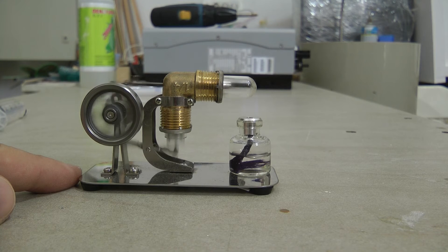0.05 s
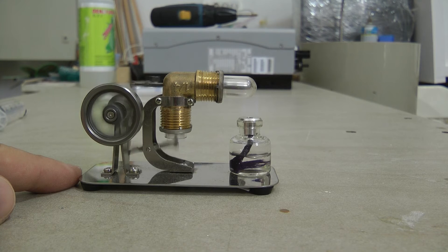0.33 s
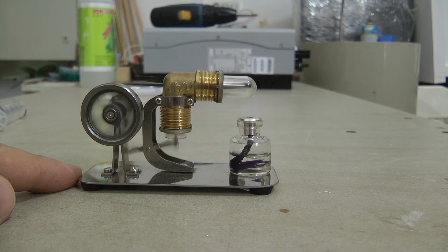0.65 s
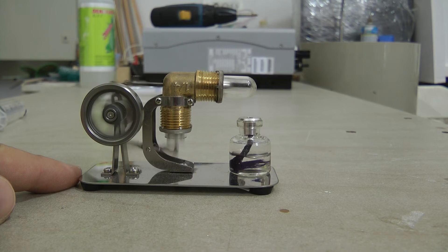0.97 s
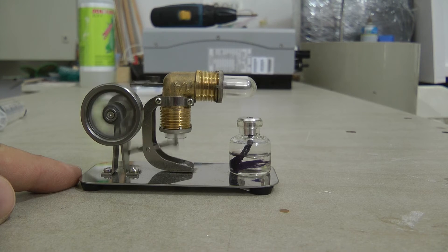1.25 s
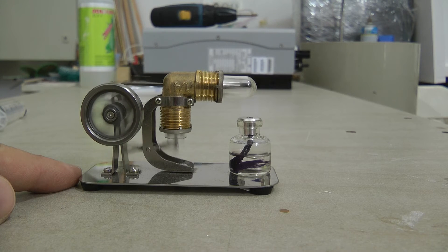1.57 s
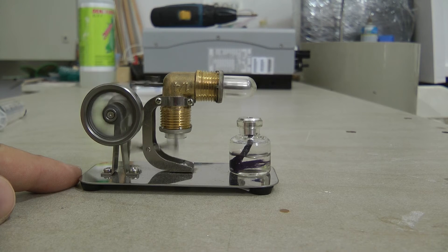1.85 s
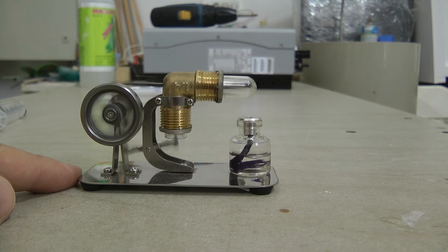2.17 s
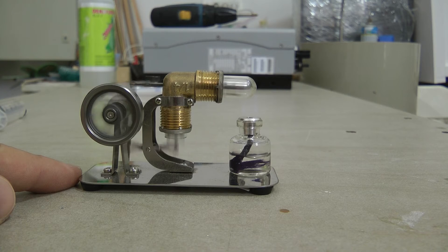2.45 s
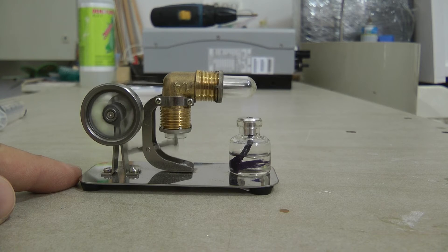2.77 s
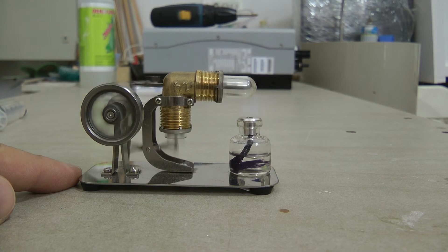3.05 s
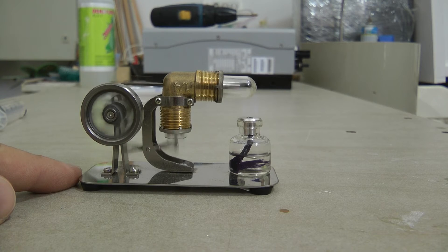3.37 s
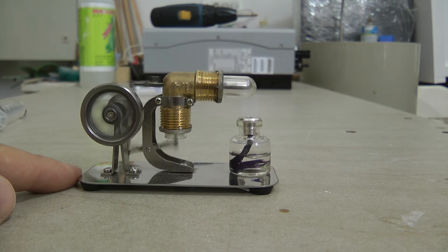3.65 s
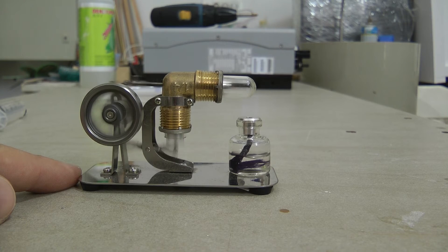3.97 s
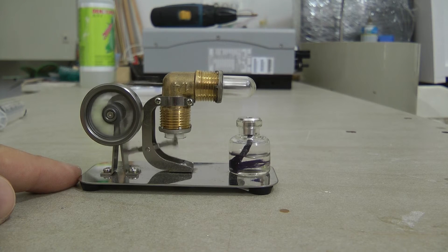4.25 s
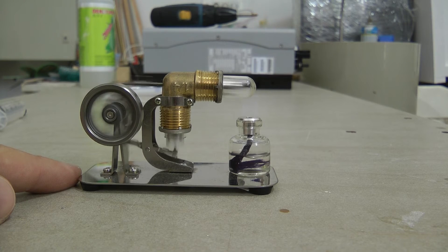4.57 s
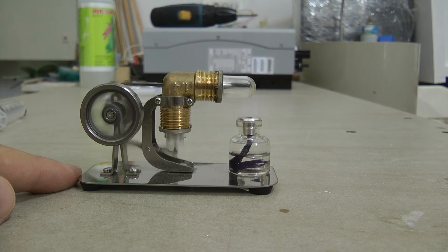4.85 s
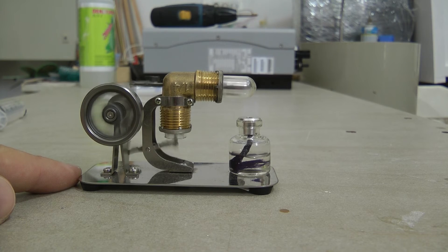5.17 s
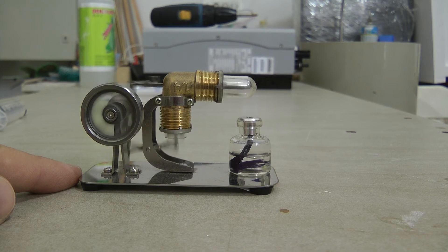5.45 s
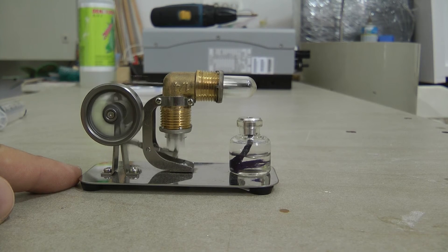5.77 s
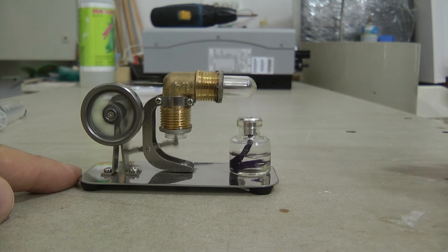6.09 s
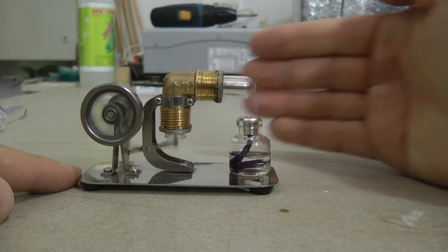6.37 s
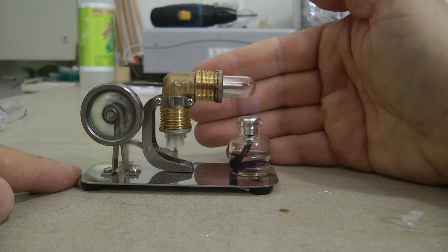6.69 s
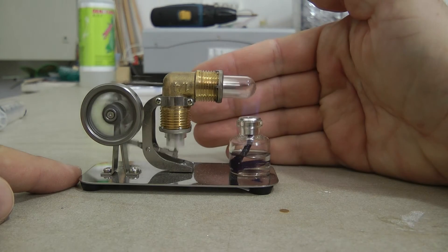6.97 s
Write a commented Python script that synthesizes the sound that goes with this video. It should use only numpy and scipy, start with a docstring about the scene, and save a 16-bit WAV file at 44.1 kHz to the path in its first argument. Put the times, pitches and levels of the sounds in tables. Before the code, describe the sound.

A small model hot-air engine runs without pause on a workbench in a quiet room. Its loose rods tick rapidly and its pistons scrape, making a bright, ringing metallic clatter over a hollow rattle from the base and a low bench hum. It gradually gets a little faster and louder. Near the end the tone shifts slightly and the base bumps softly twice. The sound is close, with little reverberation.

```python
"""A model hot-air engine runs on a workbench in quiet room noise, starting near 16 turns a second.
In each turn its loose rods knock five times and its two pistons scrape to and fro; the metal frame
rings, the base plate thuds and the bench hums. Fixed resonances colour the clatter from the start.
The speed creeps up to nearly 18 turns a second. From 6 s a nearing hand varies that colour and
strengthens a short echo, and near 6.7 s the base bumps softly twice."""
import sys
import numpy as np
from scipy import signal
from scipy.fft import rfft, irfft, next_fast_len
from scipy.io import wavfile
from scipy.ndimage import uniform_filter1d, map_coordinates

SR = 44100
rng = np.random.default_rng(int(sys.argv[2]) if len(sys.argv) > 2 else 0)


def generate_wav(sig):
    """Save sig (samples, or channels by samples) to the path in sys.argv[1] as 16-bit PCM at SR."""
    pcm = np.round(np.clip(np.atleast_2d(sig).T, -1, 1) * 32767).astype(np.int16)
    wavfile.write(sys.argv[1], SR, pcm)


N = 314433
TIME_S = np.arange(N) / SR
FFT_SIZE = next_fast_len(N + SR // 2, real=True)
BIN_HZ = np.fft.rfftfreq(FFT_SIZE, 1 / SR)
CRUISE_RPS = 17

# Spectral shapes. Each row: frequency in Hz, relative level in dB.
AIR_SPECTRUM = [(25, -28), (60, -9), (110, -9.5), (300, -0.5), (1000, -1.5), (4000, -14), (15000, -48)]
WORKSHOP_RUMBLE_SPECTRUM = [(25, -34), (50, -18), (85, -6), (200, -9), (300, -6), (450, -8), (1000, -22)]
BENCH_SPECTRUM = [(30.0, -30), (60.0, -13), (90.0, -2.5), (130.0, -6), (250.0, -2.5), (500.0, -6),
                  (800.0, -1.5), (1000.0, -18), (1500.0, -1.5)]
UNBALANCE_SPECTRUM = [(80, -4.5), (130, -7.5), (170, -2), (272, 0), (442, -6), (462, 0.5), (580, -4),
                      (700, 0)]
PLATE_SPECTRUM = [(200, -25.5), (450, -1.5), (600, -5), (740, -2.5), (820, 1.5), (940, -15), (1150, -9),
                  (1500, -13), (2500, -18), (4000, -30.5)]
FRAME_SPECTRUM = [(700.0, -7.5), (1000.0, -14), (1500.0, -19), (2400.0, -20), (2850.0, -15), (3300.0, -0.5),
                  (4300.0, -2), (4550.0, -10), (5050.0, -9), (5400.0, -3), (7200.0, -3), (7700.0, -8),
                  (12500.0, -8), (15600.0, -18)]
# Resonances. Each row: centre in Hz, width in Hz, gain in dB (negative for a notch).
BENCH_MODES = [(98, 13, 1.5), (178.4, 26, 6.5), (236, 11, 4.5), (288.3, 47, 9), (360, 29, 2.5),
               (458, 27.5, 12), (568, 27, 8)]
COLOUR_MODES = [(935, 280, 5.5), (1500, 930, -2), (3110, 306, -4), (3680, 210, -3.5), (4235, 730, 5.5),
                (5180, 370, 1), (6730, 950, -4), (9370, 400, -5), (9470, 325, 7.5), (11440, 700, 1)]
FRAME_MODES = [(1458, 350, 8.5), (2033, 370, 7.5), (2650, 140, 4.5), (3147, 126, 6.5), (3504, 31, 7.5),
               (3648, 193, 7.5), (3697, 17, 2), (3695, 34, 5), (4365, 15, 4), (5200, 37, 7.5),
               (5510, 140, 4.5), (5870, 89, 3), (6480, 200, 5), (6980, 540, 6), (8800, 440, 3.5),
               (9270, 120, 10), (10700, 690, 4), (15100, 690, 8)]
# Workshop reverberation. Each row: frequency in Hz, time to fall 60 dB in seconds.
ROOM_DECAY = [(150, 0.053), (1000, 0.23), (4000, 0.21), (15000, 0.65)]
# Base bumps. Each row: centre in seconds, peak in dB, centre-to-peak time in seconds.
BASE_BUMPS = [(6.661, -43, 0.0021), (6.717, -34.5, 0.0017)]
# Nearing hand. Each row: time in seconds, echo delay in ms, echo gain, colour mix from 0 to 1.
# The first row's values also apply before 6 s.
HAND_PATH = [(6.0, 1.5, 0.03, 1), (6.33, 0.96, 0.12, 0.64), (6.55, 0.46, 0.17, 1), (6.75, 0.39, 0.16, 1),
             (7.13, 0.54, 0.067, 1)]
# Crank speed. Each row: time in seconds, speed in turns per second.
CRANK_SPEED = [(0.0, 16.387), (0.25, 16.153), (0.5, 16.339), (0.75, 16.217), (1.25, 16.446), (2.25, 16.583),
               (2.5, 16.771), (2.75, 16.622), (3.0, 16.842), (3.5, 16.777), (4.0, 16.945), (4.5, 17.172),
               (5.75, 17.616), (6.0, 17.432), (6.25, 17.389), (7.13, 17.828)]
# Piston strokes. Each row: crank angle in turns, spread in turns, relative level in dB,
# ring centre in Hz, ring width in Hz, ring gain in dB, tilt above 2 kHz in dB per octave.
PISTON_STROKES = [(0.946, 0.047, -36, 8100, 1200, 16.5, -1), (0.025, 0.041, -35.5, 9330, 470, 10, 2),
                  (0.43, 0.13, -33, 6830, 390, 8.5, 3), (0.64, 0.033, -36, 6200, 1200, 11.5, 2.6)]
# Rod knocks. Each row: crank angle in turns, scatter in turns, relative level in dB, size scatter in dB,
# gain in dB per turn/s above cruise, strike-to-chatter ratio, decay in seconds,
# then ring and tilt as for the strokes.
ROD_KNOCKS = [(0.035, 0.013, -36, 1.5, -2, 0, 0.0027, 3450, 600, 5.5, 0.7),
              (.337, 0.014, -37, 3, 1.7, 0, 0.0019, 13300, 5000, 4.5, 0.9),
              (.463, .011, -33.5, 3.5, 1, 1.3, 0.002, 3657, 500, 11.5, 0),
              (.603, 0.004, -32.5, 1.2, -2, 2.5, 0.0011, 6550, 900, 18, 0.4),
              (0.864, 0.011, -36.5, 5.5, 3.5, 0, 0.00094, 7000, 700, -14, 3.5)]
# Microphone balance. Each row: frequency in Hz, left minus right in dB.
MIC_BALANCE = [(100, -1), (500, -0.5), (1400, .3), (4000, -0.4), (7500, 0), (10700, 2.1), (15000, .8)]


def amp(db):
    """Decibels to gain."""
    return np.exp(np.asarray(db) * (np.log(10) / 20))


def unit_rms(x):
    """Scale to rms 1."""
    return x / np.sqrt(np.mean(x ** 2) + 1e-20)


def log_interp(points, hz=BIN_HZ):
    """Interpolate (Hz, value) points on a log frequency axis."""
    point_hz, values = np.transpose(points)
    return np.interp(np.log(hz + 1), np.log(point_hz + 1), values)


def curves(rows):
    """One value per sample for each column after the time."""
    times_s, *columns = np.transpose(rows)
    return [np.interp(TIME_S, times_s, column) for column in columns]


def wobble(rate_hz):
    """Random curve of rms 1 with rate_hz knots a second."""
    return unit_rms(np.interp(TIME_S * rate_hz, np.arange(8192), rng.standard_normal(8192)))


def resonance_db(modes):
    """Summed gain of a set of resonances."""
    return sum(db / (1 + (2 * (BIN_HZ - hz) / width_hz) ** 2) for hz, width_hz, db in modes)


def ring(x, gain_db):
    """Minimum-phase filter: resonances ring on after each blow."""
    cepstrum = irfft(gain_db * (np.log(10) / 20), FFT_SIZE)
    cepstrum[1:FFT_SIZE // 2] *= 2
    cepstrum[FFT_SIZE // 2 + 1:] = 0
    return irfft(rfft(x, FFT_SIZE) * np.exp(rfft(cepstrum)), FFT_SIZE)[..., :N]


def room_noise(width=0.72, air_db=-49, rumble_db=-59.5):
    """Room air, partly alike on both sides, over a diffuse low rumble."""
    mid, side = ring(rng.standard_normal((2, N)), log_interp(AIR_SPECTRUM))
    air = unit_rms(np.array([mid + width * side, mid - width * side]))
    rumble = unit_rms(ring(rng.standard_normal((2, N)), log_interp(WORKSHOP_RUMBLE_SPECTRUM)))
    return amp(air_db) * air + amp(rumble_db) * rumble


def room_reverb(x, level_db=-13.0):
    """Diffuse reflections of the workshop, different on each side."""
    hz, t_s, spectra = signal.stft(rng.standard_normal((2, SR // 3)), SR, nperseg=256)
    decay = amp(-60 * t_s / log_interp(ROOM_DECAY, hz)[:, None])
    tail = signal.istft(spectra * decay, SR, nperseg=256)[1]
    delayed = np.pad(x, (SR // 500, 0))[None]
    return amp(level_db) * signal.fftconvolve(delayed, tail / np.linalg.norm(tail[0]), axes=1)[:, :N]


def base_bumps():
    """The base rocks against the bench: one dull pressure swing each time."""
    out = np.zeros(N)
    for centre_s, peak_db, to_peak_s in BASE_BUMPS:
        offset = (TIME_S - centre_s) / to_peak_s
        out += amp(peak_db) * offset * np.exp((1 - offset ** 2) / 2)
    return out


def bench_hum(turns, excess_rps, clatter, hum_db=-42.5, db_per_rps=-0.6, rumble_db=-45.5):
    """Crank shake and clatter jolts pass through the feet; harmonics swell at the bench's resonances."""
    modes_db = resonance_db(BENCH_MODES)
    uneven_turns = turns + 0.002 * wobble(5)
    shake = np.zeros(N)
    for order in np.arange(5, 37):
        even_db = 4 * (order % 2 == 0)  # two strokes a turn favour even harmonics
        db = log_interp(UNBALANCE_SPECTRUM, order * CRUISE_RPS) + even_db + 1.4 * wobble(2.42)
        shake += amp(db) * np.sin(2 * np.pi * (order * uneven_turns + rng.random()))
    hum = unit_rms(ring(shake, modes_db))
    clatter_rms = np.sqrt(np.abs(uniform_filter1d(clatter ** 2, size=130)))
    jolts = clatter_rms * rng.standard_normal(N)
    feet_db = -10 * np.log10(1 + (BIN_HZ / 950) ** 6)  # rubber holds back the treble
    rumble = unit_rms(ring(jolts, log_interp(BENCH_SPECTRUM) + modes_db + feet_db))
    return amp(hum_db + db_per_rps * excess_rps) * hum + amp(rumble_db) * rumble


def plate_thuds(turns, angle_turns=0.035, decay_turns=0.14, level_db=-50.5):
    """Once a turn a knock shakes the base plate: a hollow thud that rattles away."""
    since_turns = (turns - angle_turns) % 1
    rattle = np.exp(-since_turns / decay_turns) * rng.standard_normal(N)
    return amp(level_db) * unit_rms(ring(rattle, log_interp(PLATE_SPECTRUM)))


def colour_and_echo(x):
    """Fixed resonances colour the sound; from 6 s a hand varies the mix and strengthens a short echo."""
    delay_ms, echo_gain, colour_mix = curves(HAND_PATH)
    coloured = x + colour_mix * (ring(x, resonance_db(COLOUR_MODES)) - x)
    echo = map_coordinates(coloured, [np.arange(N) - delay_ms * SR / 1000], order=3)
    return coloured + echo_gain * echo


def metal_contact(envelope, frame_db, ring_hz, width_hz, ring_db, db_per_octave, grit_db=1.5, strike=0):
    """Gritty contact, plus any clean strike, rings the frame and the touched part; rms 1."""
    grit = rng.standard_normal(N) * amp(grit_db * wobble(1100))
    part_db = resonance_db([(ring_hz, width_hz, ring_db)])
    tilt_db = db_per_octave * np.log2(np.maximum(BIN_HZ, 2000) / 2000)
    return unit_rms(ring(envelope * grit + strike, frame_db + part_db + tilt_db))


def bearing_hiss(frame_db):
    """The bearings rub all round the turn."""
    return amp(-33.5) * metal_contact(1, frame_db, ring_hz=3900, width_hz=1100, ring_db=-2.5,
                                      db_per_octave=-1.5, grit_db=1.0)


def piston_scrapes(turns, frame_db):
    """The pistons scrape where they move fastest."""
    out = np.zeros(N)
    for angle_turns, spread_turns, db, *colour in PISTON_STROKES:
        offset_turns = (turns - angle_turns + 0.5) % 1 - 0.5
        stroke = np.exp(-0.5 * (offset_turns / spread_turns) ** 2) * amp(1.1 * wobble(30))
        out += amp(db) * metal_contact(stroke, frame_db, *colour)
    return out


def rod_knocks(turns, excess_rps, frame_db, rise_s=0.00052):
    """Each joint's play closes once a turn with a short chatter; speed shifts load between joints."""
    t_s = np.arange(SR // 40) / SR
    whole_turns = np.arange(int(turns[-1]) + 1)
    out = np.zeros(N)
    for angle_turns, scatter_turns, db, size_db, db_per_rps, hardness, decay_s, *colour in ROD_KNOCKS:
        timing_draw, size_draw = rng.uniform(-0.8, 1, (len(whole_turns), 2)).T
        onsets = np.searchsorted(turns, whole_turns + angle_turns + scatter_turns * timing_draw)
        blows = np.bincount(onsets, amp(size_db * size_draw), N + 1)[:N]
        envelope = np.exp(-t_s / decay_s) * (1 - np.exp(-t_s / rise_s))
        chatter = signal.oaconvolve(blows, envelope / np.linalg.norm(envelope))[:N]
        knocks = metal_contact(chatter, frame_db, *colour, strike=hardness * blows)
        out += amp(db + db_per_rps * excess_rps) * knocks
    return out


def scene(clatter_gain_db=-0.8, db_per_rps=0.6):
    """The crank drives knocks, scrapes, thuds and hum; the clatter grows with speed."""
    speed_rps, = curves(CRANK_SPEED)
    excess_rps = speed_rps - CRUISE_RPS
    turns = np.cumsum(speed_rps) / SR
    bass_loss_db = 10 * np.log10(1 + (800 / (BIN_HZ + 20)) ** 4)  # small parts radiate little bass
    frame_db = log_interp(FRAME_SPECTRUM) + resonance_db(FRAME_MODES) - bass_loss_db
    clatter = rod_knocks(turns, excess_rps, frame_db)
    clatter += bearing_hiss(frame_db) + piston_scrapes(turns, frame_db)
    clatter *= amp(clatter_gain_db + db_per_rps * excess_rps)
    engine = colour_and_echo(clatter + plate_thuds(turns)) + bench_hum(turns, excess_rps, clatter)
    return engine + room_reverb(engine) + base_bumps() + room_noise()


def record(dry, top_hz=15900):
    """Two band-limited microphones, slightly different in colour."""
    balance = amp(log_interp(MIC_BALANCE) * np.array([[0.5], [-0.5]]))
    return irfft(rfft(dry, FFT_SIZE) * balance * (BIN_HZ < top_hz), FFT_SIZE)[:, :N]


dry = scene()
out = record(dry)
generate_wav(out)
```